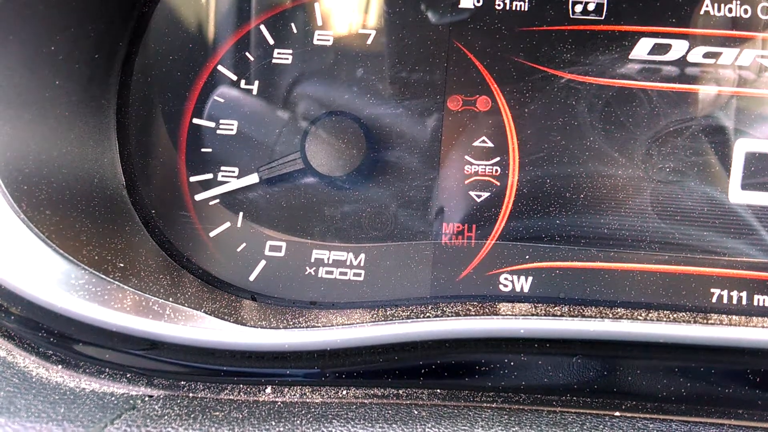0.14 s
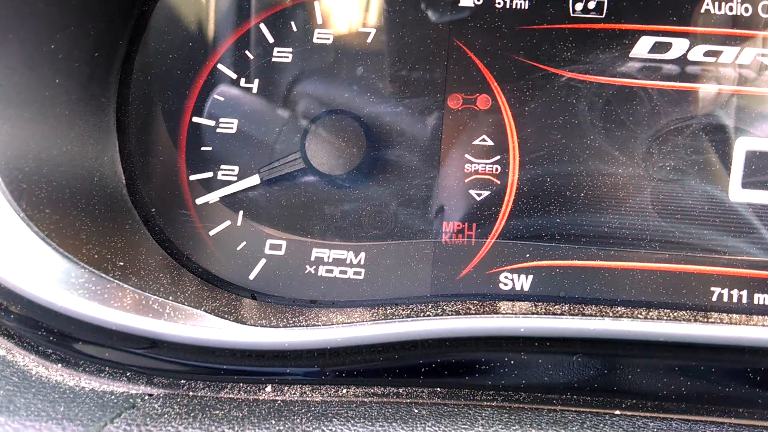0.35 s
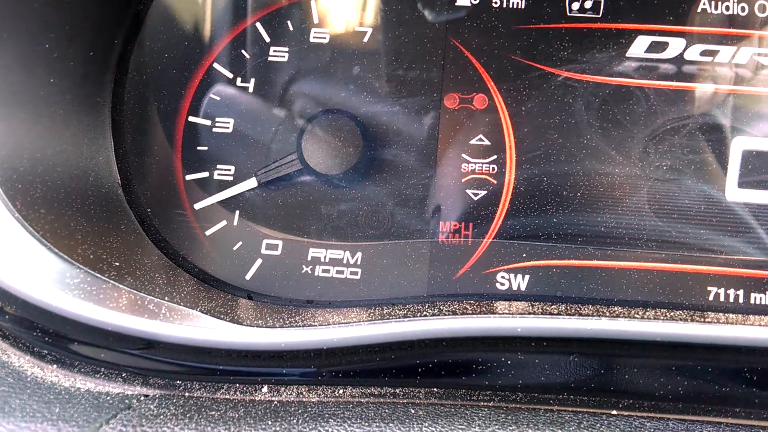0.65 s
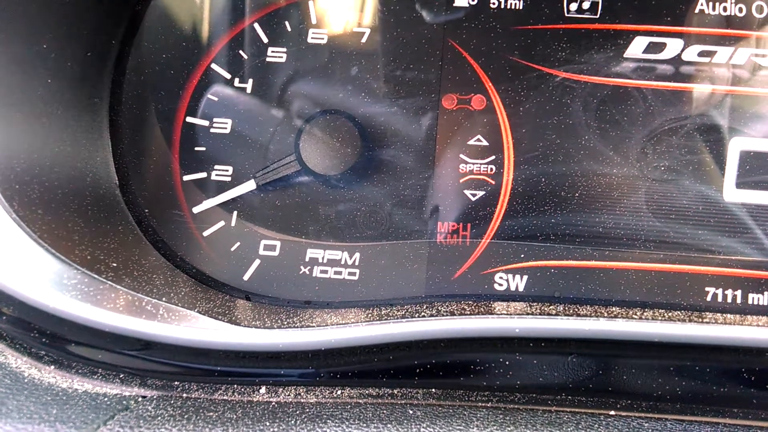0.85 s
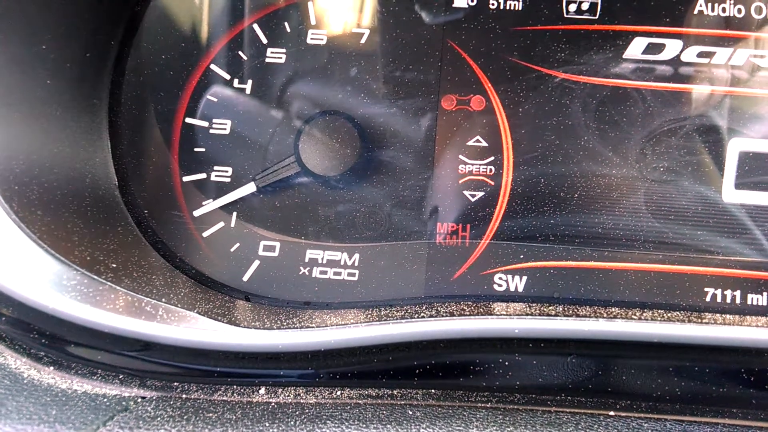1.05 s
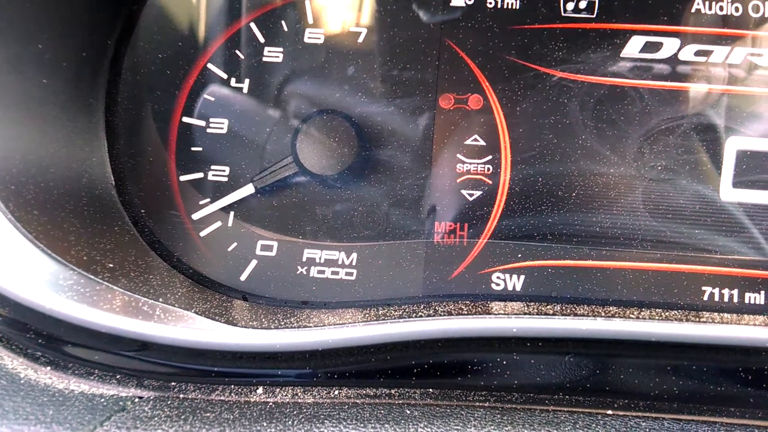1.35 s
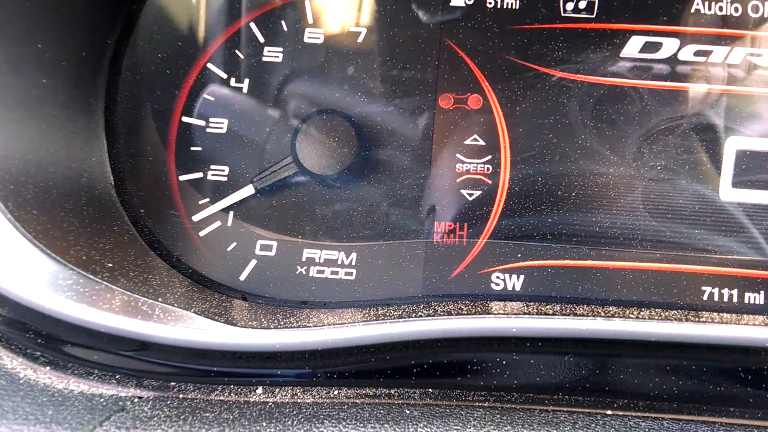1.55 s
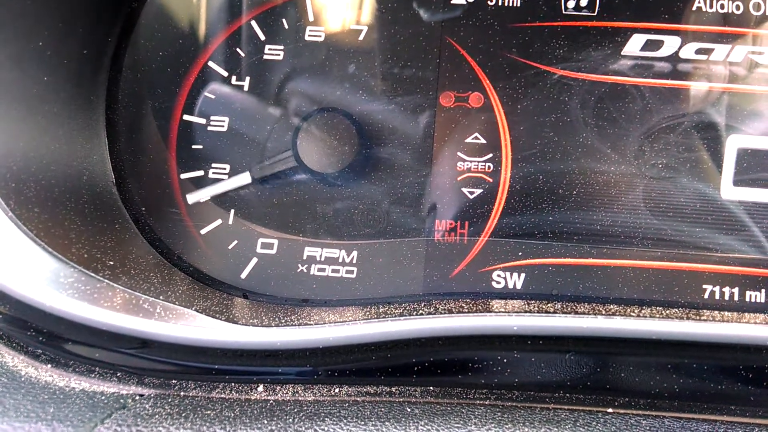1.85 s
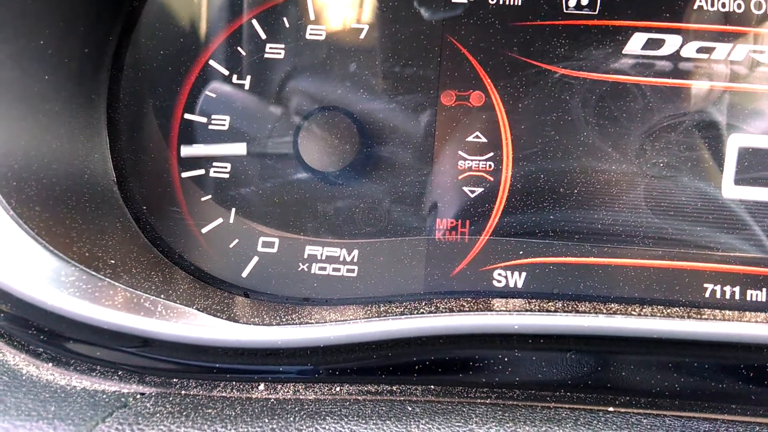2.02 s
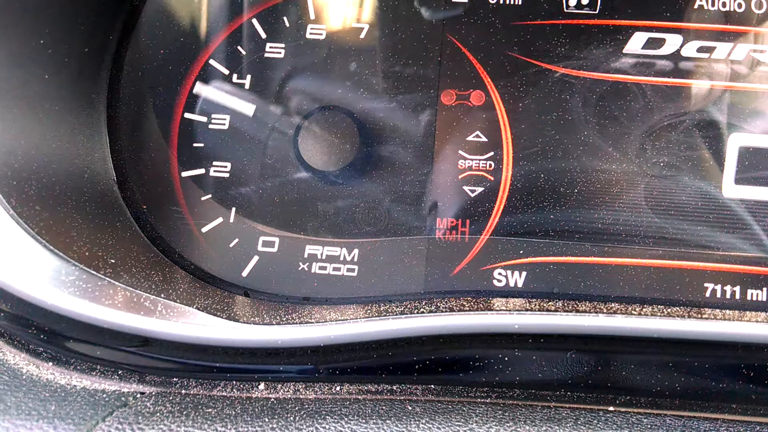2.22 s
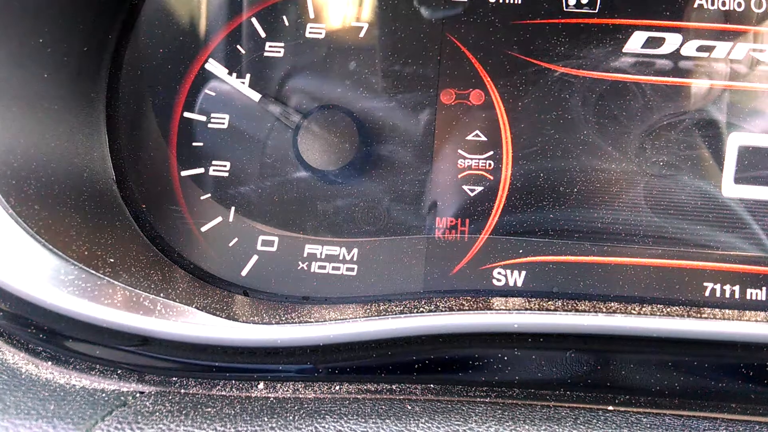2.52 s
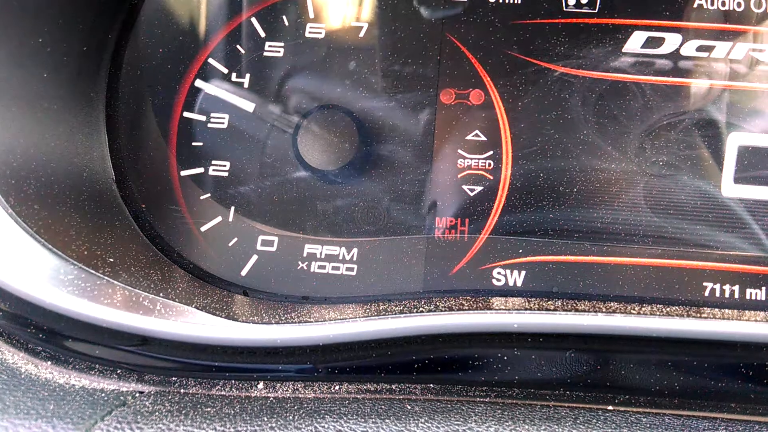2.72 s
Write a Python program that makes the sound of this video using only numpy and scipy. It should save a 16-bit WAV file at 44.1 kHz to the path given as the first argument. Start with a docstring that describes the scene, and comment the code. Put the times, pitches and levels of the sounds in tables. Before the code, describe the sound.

A four-cylinder car engine idles deep and slowly sags, then revs up fast into a growl; a short airy valve hiss and rasp follows as the pitch falls, with low wind thumps on the left microphone.

```python
"""Driver's seat of a four-cylinder car: the idle sinks slowly, then revs hard; a valve vents boost air in a hiss.
The firing tone is a gliding sine; pulses and gated noise through body resonances make the growl.
Filtered noise makes clatter, hiss, vent, ticks and buffeting; low wave packets thump the left port.
Sines make the overtones, pump whine, thin electronic tones and a far bird.
A late copy of each port is taken from the other, which widens the stereo and combs the treble."""
import sys
import numpy as np
from scipy.fft import rfft, irfft, next_fast_len
from scipy.io import wavfile
from scipy.ndimage import map_coordinates

SR = 44100
rng = np.random.default_rng(int(sys.argv[2]) if len(sys.argv) > 2 else 0)


def log_audio(samples):
    """Write samples as a 16-bit WAV file to the path given in sys.argv[1]."""
    # one column per channel
    frames = np.atleast_2d(samples).T
    # limit to full scale, then quantise
    limited = np.clip(frames, -1, 1)
    pcm = np.round(limited * 32767).astype(np.int16)
    wavfile.write(sys.argv[1], SR, pcm)


N = 127008
T_S = np.arange(N) / SR

# Electronic tones: (frequency [Hz], rms level [dB], waver [dB])
TONES = [(9775, -70.5, 1), (12985, -81, 3)]
TONES_END_S, TONES_FADE_S = 1.95, .1

# Bird whistles outside: (start [s], level [dB])
BIRD = [(.375, -65.5), (.67, -64), (.97, -63.5)]
BIRD_HIGH_HZ, BIRD_LOW_HZ = 2590, 2250
BIRD_DROP_S, BIRD_GLIDE_S, BIRD_LENGTH_S = .085, .009, .14

# Small dry ticks: (time [s], level [dB])
TICKS = [(1.15, -56), (1.208, -49), (1.4, -56)]
# Tick spectrum: (frequency [Hz], level [dB])
TICK_COLOUR = [(700, 0), (3200, -5), (5000, -40)]
TICK_S = .001

# Air thumps on the left port: (time [s], level [dB], frequency [Hz], length [cycles])
THUMPS = [(0.072, -8, 110, 0.85), (0.367, -10, 91.6, 3), (0.473, -22, 103, 5.6), (0.712, -17.5, 75.5, 3.1),
          (0.82, -11, 78, 2.1), (0.987, -15, 90, 0.45), (1.025, -20.5, 115, 0.82), (1.065, -16, 70, 1.2),
          (1.099, -7.5, 85.5, 0.89), (1.152, -8, 112, 2.2), (1.186, -13, 99, 1.7), (1.207, -2, 113, 0.69),
          (1.252, -8.5, 90, 0.47), (1.29, -11.5, 93, 0.76), (1.353, -7, 129, 1.6), (1.48, -13, 97.07, 0.38),
          (1.505, -7.5, 107, 2.5), (1.529, -7, 114, 0.46), (1.554, -9, 70.46, 0.42),
          (1.665, -21, 82.6, 1.3), (1.738, -15.5, 100, 4.6), (2.102, -6, 107.2, 0.79),
          (2.128, -8, 90.04, 0.96), (2.305, -6.5, 102, 0.85), (2.367, -10, 140, 0.94),
          (2.452, -11, 95, 1.1), (2.478, -9.5, 117.1, 0.49), (2.511, -5, 130.2, 0.99),
          (2.657, -14, 90, 1.154), (2.752, -8.5, 109, 0.91)]
# Buffeting spectrum: (frequency [Hz], level [dB])
BUFFET = [(15, -40), (30, 16.5), (50, 15), (80, 4.5), (135, 1.5), (300, -14.5), (600, -49), (1000, -53.5)]
THUMP_EDGE_DB = -9  # relative to its thump
BUFFET_DB, RIGHT_AIR_DB, LUMPS_DB = -21, -6.5, 3.5

# Valve bursts: (peak [s], level [dB], fall [s], mix [0 hiss to 1 rasp])
VENT = [(2.311, -34, 0.031, 0.24), (2.365, -38.5, 0.026, 0.7)]
# Vent hiss spectrum: (frequency [Hz], level [dB])
VENT_COLOUR = [(800, -18), (1900, -1), (2600, 5.5), (3300, 5.5), (5200, -5), (7400, 5), (11000, -6),
               (15300, -25)]
# Duct resonances as the valve chatters: (frequency [Hz], width [Hz], level [dB])
RASP = [(1360, 110, 3), (1880, 59, -0.5), (3190, 170, -1)]
VENT_RISE_S = .006

# Firing tone: (time [s], firing rate [Hz], rms level [dB], side over mid [dB])
FIRING = [(0, 51.86, -25, -16), (.36, 48.72, -13, -35), (.55, 46.22, -19, -36), (.82, 43.98, -11, -27),
          (1, 42.24, -18.5, -34), (1.16, 42.69, -22, -19), (1.51, 39.1, -22, -31),
          (1.64, 43.62, -21.5, -35), (1.72, 57.48, -25.5, -32), (1.87, 80.58, -8.5, -29),
          (1.98, 101.9, -11, -9), (2.04, 114.4, -31, -14), (2.17, 137.1, -13, -12.5),
          (2.29, 136.9, -19, -15), (2.34, 136, -15, -10), (2.43, 126.3, -24, -14),
          (2.55, 119.2, -13.5, -23), (2.73, 110.2, -26, -5), (2.88, 100.3, -11, -18)]
SIDE_LAG_RAD = 0.055

# Engine load: (time [s], exhaust growl [dB], valve-gear clatter [dB], intake and belt hiss [dB])
LOAD = [(.02, -36, -60, -64), (.22, -37, -63, -66), (1.03, -32.5, -56.5, -58.5), (1.28, -37, -61, -64.5),
        (1.61, -34, -58.5, -60.5), (1.71, -21.5, -51.5, -57.5), (1.94, -18, -45.5, -53.5),
        (2.01, -24.5, -51.5, -58), (2.11, -17.5, -42, -51.5), (2.16, -24, -44, -53), (2.29, -23, -45, -52),
        (2.41, -27, -49.5, -47), (2.73, -29.5, -48.5, -51), (2.86, -28, -49.5, -51.5)]
# Firing overtones: (multiple of firing rate, amplitude over the growl level before the cabin [dB])
OVERTONES = [(2, -8.5), (2.5, -11.5), (3, -9), (3.5, -14.5), (4, -13), (5, -14)]
# Cabin gain on the overtones: (frequency [Hz], gain [dB])
CABIN = [(90, -1), (140, 8), (210, -3), (420, 0), (700, -9)]
# Firing strength of each cylinder: level [dB]
CYLINDERS_DB = [0, -1.5, .7, -2]
# Roughness, higher at speed: (firing rate [Hz], noise share [power fraction])
NOISY = [(70, .45), (115, .8)]
# Body resonances: (frequency [Hz], width [Hz], level [dB])
BODY = [(150, 115, -1.5), (217.3, 30, 9), (273.6, 42, 3), (399.5, 42, 5), (518, 69.4, 1.5),
        (580.5, 53.2, 4), (604.8, 30.2, 5), (695.6, 56, -6.5), (810, 57, -9)]
# Clatter spectrum: (frequency [Hz], level [dB])
CLATTER = [(600, 7.5), (900, 5.5), (1200, 1.5), (1450, 0), (1650, -6), (1900, -4.5), (2500, -15.5),
           (3200, -54)]
# Intake and belt hiss spectrum: (frequency [Hz], level [dB])
HISS = [(1800, -33), (2500, 0), (3200, 1), (4500, -6), (6500, -1), (7200, 0), (8200, -2.5), (10000, -6),
        (12500, -13), (15300, -23)]
JITTER_TURNS, SCATTER_DB, GATE = .02, 1.2, .4  # turns: firing periods
WHINE_ORDER, WHINE_DB, WHINE_TOP_HZ = 11.5, -41, 720  # order: multiple of firing rate
GROWL_SIDE_DB, CLATTER_SIDE_DB, HISS_SIDE_DB = -8, 2.5, -1  # side over mid

FADE_IN_S = .008
RIGHT_BRIGHT_DB, BRIGHT_HZ = 5.5, 8900  # right over left treble
PORT_LAG_S, WIDEN, WIDEN_TOP_HZ = .00037, .72, 12000
CEILING, TOP_HZ = .97, 15450


def amp(db):
    """dB to gain."""
    return 10 ** (np.asarray(db) / 20)


def unit(x):
    """Scale to rms 1."""
    return x / np.sqrt(np.mean(x ** 2) + 1e-20)


def curves(rows):
    """One value per sample for each column after the time."""
    time_s, *columns = np.transpose(rows)
    return [np.interp(T_S, time_s, column) for column in columns]


def wobble(rate_hz):
    """Smooth random curve, rate_hz knots a second."""
    knots = rng.standard_normal(int(N * rate_hz / SR) + 4)
    return map_coordinates(knots, [T_S * rate_hz])


def sine(turns):
    """Sine of a phase in turns."""
    return np.sin(2 * np.pi * turns)


def filtered(x, response):
    """x times a complex response of frequency."""
    size = next_fast_len(N + SR // 2)
    spectrum = rfft(x, size) * response(np.fft.rfftfreq(size, 1 / SR))
    return irfft(spectrum, size)[..., :N]


def coloured(x, points):
    """x through (Hz, dB) points on a log axis, closed below, held above, rms 1."""
    f, level_db = np.transpose(points)

    def response(hz):
        return amp(np.interp(np.log(hz + 1), np.log(f + 1), level_db, -120, level_db[-1]))
    return unit(filtered(x, response))


def ringing(modes):
    """Response of summed (Hz, width Hz, dB) resonances, alternating in sign."""
    def response(hz):
        return sum((-1) ** k * amp(db) * 1j * hz * width / (centre ** 2 - hz ** 2 + 1j * hz * width)
                   for k, (centre, width, db) in enumerate(modes))
    return response


def ports(x, side_db):
    """Rows (mid, side) to left and right."""
    mid, side = x[0], amp(side_db) * x[1]
    return np.array([mid + side, mid - side])


def tones():
    """Electronics: thin sines, wavering in level, that fade out together."""
    fade = 1 / (1 + np.exp((T_S - TONES_END_S) / TONES_FADE_S))
    x = sum(np.sqrt(2) * amp(db + waver_db * wobble(4)) * sine(hz * T_S) for hz, db, waver_db in TONES)
    return np.tile(fade * x, (2, 1))


def bird():
    """Each whistle holds a high note and slides to a low one; left port only."""
    x = np.zeros(N)
    for start_s, db in BIRD:
        age_s = T_S - start_s
        drop = (1 - np.tanh((age_s - BIRD_DROP_S) / (2 * BIRD_GLIDE_S))) / 2
        hz = BIRD_LOW_HZ + (BIRD_HIGH_HZ - BIRD_LOW_HZ) * drop
        shape = np.sin(np.pi * np.clip(age_s / BIRD_LENGTH_S, 0, 1)) ** .5
        x = x + np.sqrt(2) * amp(db + 2 * wobble(40)) * shape * sine(np.cumsum(hz) / SR)
    return x * [[1], [0]]


def ticks():
    """Brief dull noise clicks, stronger on the left."""
    shape = sum(amp(db) * np.exp(-((T_S - s) / TICK_S) ** 2) for s, db in TICKS)
    return shape * coloured(rng.standard_normal(N), TICK_COLOUR) * [[1], [.5]]


def thumps():
    """Moving air hits the left port: low wave packets, each with a faster edge."""
    x = np.zeros(N)
    for s, db, hz, cycles in THUMPS:
        turns = (T_S - s) * hz
        packet = np.cos(2 * np.pi * turns - .3) * np.exp(-(1.35 * turns / cycles) ** 2)
        edge = amp(THUMP_EDGE_DB) * np.cos(5 * np.pi * turns) * np.exp(-(2.2 * turns) ** 2)
        x = x + amp(db) * (packet + edge)
    return x * [[1], [0]]


def buffeting():
    """Lumpy low air noise, independent on each port, weaker on the right."""
    lumps = amp(LUMPS_DB * np.array([wobble(25), wobble(25)]))
    noise = coloured(lumps * rng.standard_normal((2, N)), BUFFET)
    return amp(BUFFET_DB) * noise * amp([[0], [RIGHT_AIR_DB]])


def vent():
    """Boost air escapes in a bright hiss, then mostly in a lower rasp as the duct rings."""
    hiss = coloured(rng.standard_normal((2, N)), VENT_COLOUR)
    chatter = rng.standard_normal(N) ** 3 + rng.standard_normal((2, N))  # spiky, common to both ports
    rasp = unit(filtered(chatter, ringing(RASP)))
    x = np.zeros((2, N))
    for peak_s, db, fall_s, mix in VENT:
        burst = np.exp(np.minimum((T_S - peak_s) / VENT_RISE_S, (peak_s - T_S) / fall_s))
        x = x + amp(db) * burst * ((1 - mix) * hiss + mix * rasp)
    return x


def boom(turns):
    """The firing tone in the cabin, a sine leaning left."""
    _, level_db, side_db = curves(FIRING)
    phase = 2 * np.pi * turns
    mid_side = [np.sin(phase), np.sin(phase - SIDE_LAG_RAD)]
    return np.sqrt(2) * amp(level_db) * ports(mid_side, side_db)


def whine(turns, rate_hz):
    """Belt-driven pump: a sine locked to the engine, muffled above its top."""
    muffle = 1 / (1 + (WHINE_ORDER * rate_hz / WHINE_TOP_HZ) ** 6)
    level = amp(WHINE_DB + 3.5 * wobble(16))
    tone = np.sin(2 * np.pi * WHINE_ORDER * turns + .6 * wobble(20))
    return level * tone * muffle * [[1.2], [.8]]


def overtones(turns, rate_hz):
    """Multiples of the firing rate, shaped by the cabin, wandering in level and phase."""
    x = np.zeros(N)
    for multiple, db in OVERTONES:
        cabin_db = np.interp(multiple * rate_hz, *np.transpose(CABIN))
        level = amp(db + cabin_db + 4 * wobble(16))
        x = x + level * np.sin(2 * np.pi * multiple * turns + .7 * wobble(22))
    return x


def gated_noise(gate, depth):
    """Two noise rows pulsing with the firings, rms 1."""
    return unit(gate ** depth * rng.standard_normal((2, N)))


def growl(pulses, gate, rate_hz):
    """Exhaust: firing pulses and gated noise ring the body."""
    share = np.interp(rate_hz, *np.transpose(NOISY))
    drive = np.sqrt(share) * gated_noise(gate, 0.7) + np.sqrt(1 - share) * pulses * [[1], [.6]]
    body = ringing(BODY)
    return ports(unit(filtered(drive, lambda hz: body(hz) / (1 + (hz / 900) ** 8))), GROWL_SIDE_DB)


def engine(turns):
    """Uneven cylinders drive the growl; clatter and hiss pulse lightly with the same firings."""
    growl_db, clatter_db, hiss_db = curves(LOAD)
    rate_hz = curves(FIRING)[0]
    beat = np.floor(turns + JITTER_TURNS * wobble(60)).astype(int)
    cylinder_db = np.array(CYLINDERS_DB)[beat % len(CYLINDERS_DB)]
    strength = amp(cylinder_db + SCATTER_DB * rng.standard_normal(1000)[beat])
    fires = np.diff(beat, prepend=beat[0]) > 0
    pulses = strength * fires * np.sqrt(SR / rate_hz)  # keeps power even across rates
    gate = strength * (1 + GATE * np.cos(2 * np.pi * turns))
    exhaust = growl(pulses, gate, rate_hz) + overtones(turns, rate_hz)
    clatter = ports(coloured(gated_noise(gate, 0.31), CLATTER), CLATTER_SIDE_DB)
    hiss = ports(coloured(gated_noise(gate, 0.17), HISS), HISS_SIDE_DB)
    x = amp(growl_db) * exhaust + whine(turns, rate_hz)
    x = x + amp(clatter_db + 1.5 * wobble(11.84)) * clatter
    return x + amp(hiss_db + 0.97 * wobble(10.64)) * hiss


def scene():
    """All sources at the two ports."""
    turns = np.cumsum(curves(FIRING)[0]) / SR  # one turn per firing
    background = tones() + bird() + ticks() + thumps() + buffeting()
    return background + vent() + boom(turns) + engine(turns)


def record(dry):
    """Brighten the right port, widen with late crossed copies, clip peaks softly, cut above TOP_HZ."""
    def brightness(hz):
        treble = 1 / (1 + (BRIGHT_HZ / (hz + 1)) ** 6)
        return amp(np.array([[-.5], [.5]]) * RIGHT_BRIGHT_DB * treble)

    def late_dull(hz):
        return np.exp(-2j * np.pi * hz * PORT_LAG_S) / (1 + (hz / WIDEN_TOP_HZ) ** 2)
    x = filtered(dry * np.minimum(T_S / FADE_IN_S, 1), brightness)
    x = x - WIDEN * filtered(x[::-1], late_dull)
    x = x / (1 + np.abs(x / CEILING) ** 6) ** (1 / 6)
    return filtered(x, lambda hz: hz < TOP_HZ)


dry = scene()
out = record(dry)
log_audio(out)
```